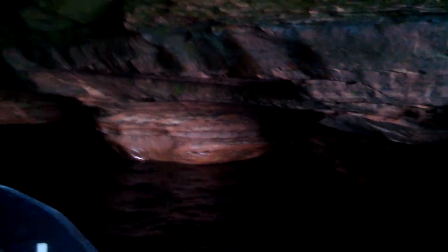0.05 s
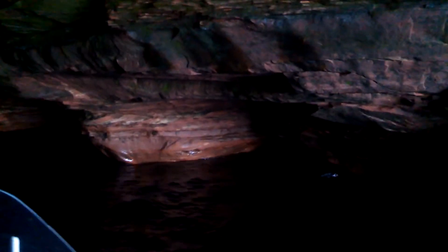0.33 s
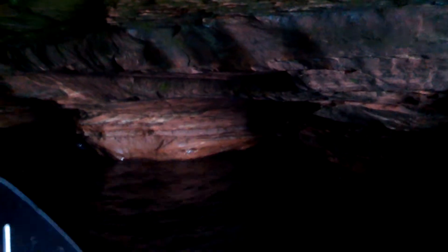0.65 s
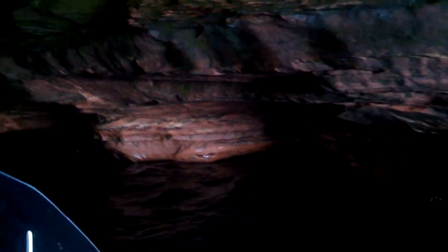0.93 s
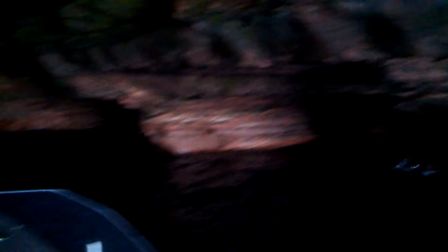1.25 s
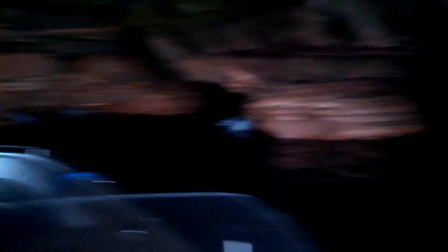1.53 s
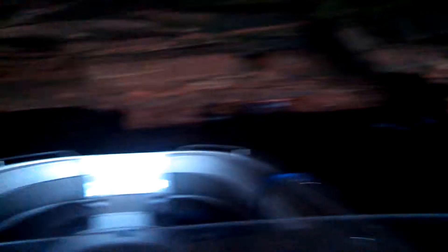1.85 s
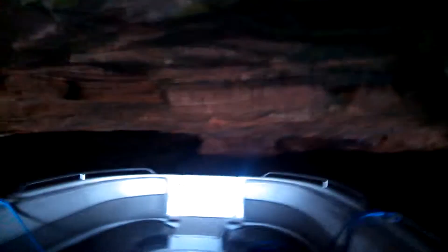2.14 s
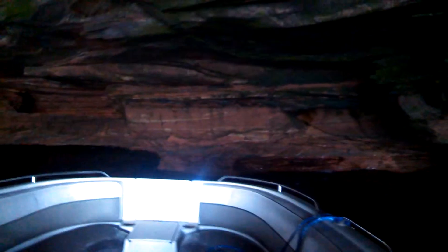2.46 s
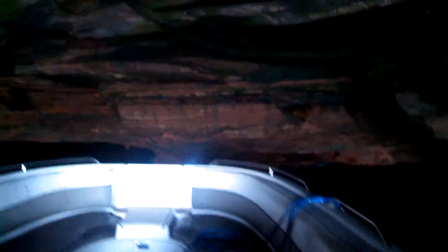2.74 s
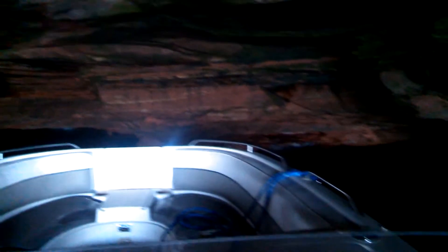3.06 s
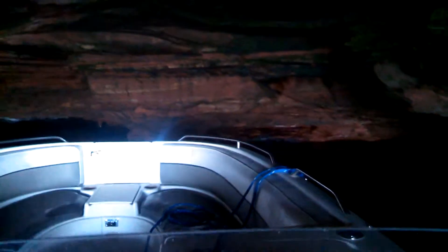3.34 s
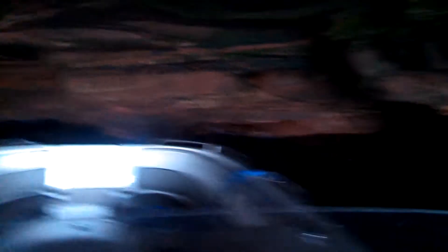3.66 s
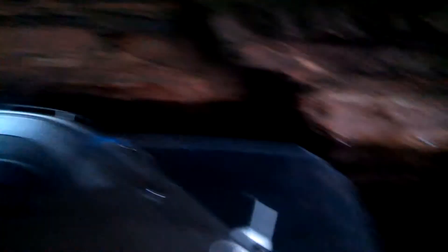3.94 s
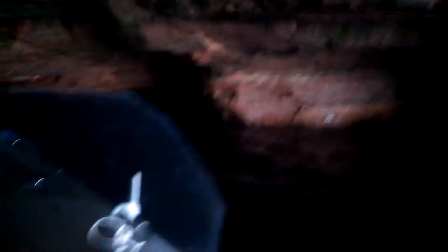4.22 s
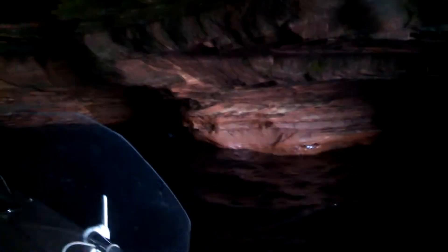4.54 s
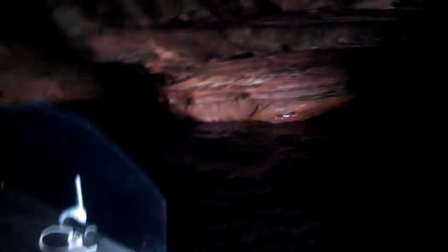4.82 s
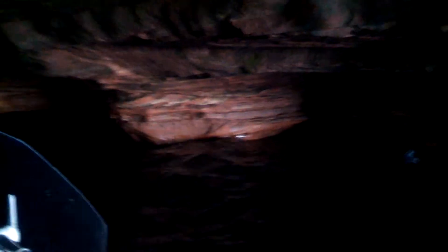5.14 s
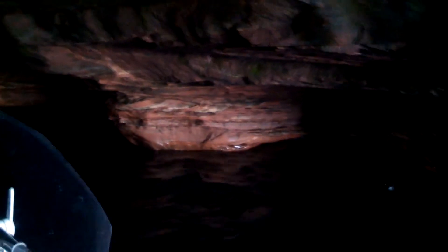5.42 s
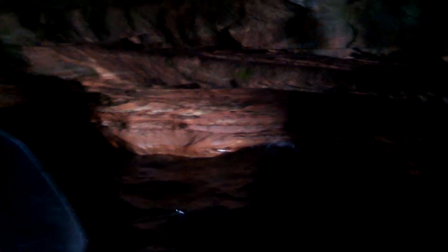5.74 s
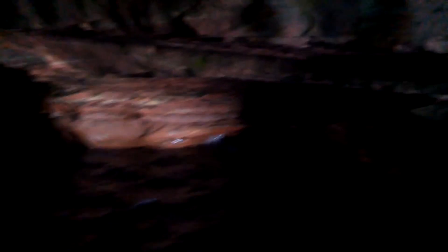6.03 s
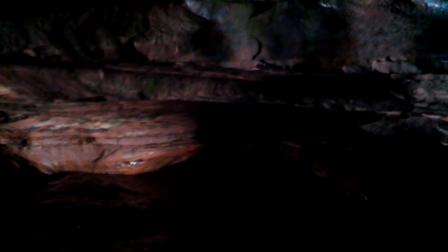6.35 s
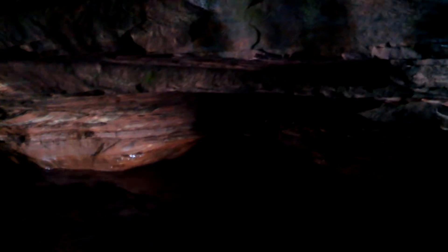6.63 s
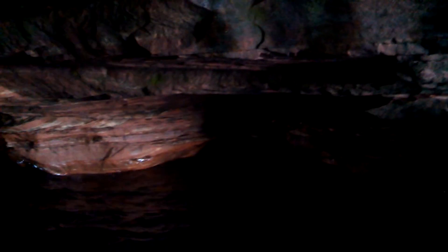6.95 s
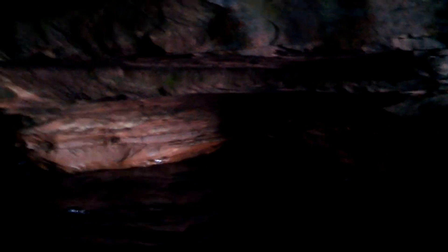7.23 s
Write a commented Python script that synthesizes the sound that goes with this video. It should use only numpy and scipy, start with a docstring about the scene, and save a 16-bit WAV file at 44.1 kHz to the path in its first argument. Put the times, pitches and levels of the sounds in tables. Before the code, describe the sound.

Waves wash against rock inside a cave for about seven and a half seconds, heard close and in wide stereo from a small boat. The churning, bubbling rush never stops, surging gently about three times a second with fine spray and a low, hollow boom underneath. Short gulps of trapped air pop up throughout, clearest near 0.2, 5.8 and 7 seconds. Water gurgles in rock hollows around 0.4 and 0.8 seconds, from 2 to 3 seconds, and near 4.4. Brief splashes stand out, leaning left, around 1, 2.2 and 3.3 seconds, several times between 4.3 and 5.8, and again at the very end. A faint, very deep hum swells to a peak at about 2 seconds and sinks away by 3.5. Soft, dull bumps reach the microphone now and then, most noticeably near 1.8 and 4.3 seconds. The walls add a short echo.

```python
"""Waves wash against the rock deep in a sea cave, heard from a small boat through two close microphones.
Each wave is a rush of churning water with bubbles and spray, and a few splashes stand out.
Trapped air gulps and pouring water gurgles in hollows of the rock; the waves keep the cave's air booming.
A low hum swells once, soft bumps reach the microphones, and the stereo sound is widened."""
import sys
import numpy as np
from scipy import signal
from scipy.fft import rfft, irfft, next_fast_len
from scipy.io import wavfile

SR = 44100
rng = np.random.default_rng(int(sys.argv[2]) if len(sys.argv) > 2 else 0)


def transcribe(u):
    """Save the signal u as a 16-bit wav file named by the first command-line argument.

    u: samples, shape (n,) or (channels, n), limited to [-1, 1]; the rate is SR.
    q: integer samples, one column per channel.
    """
    v = np.clip(np.atleast_2d(u).T, -1, 1)
    q = np.round(v * 32767).astype(np.int16)
    wavfile.write(sys.argv[1], SR, q)


N = 325458
TIME = np.arange(N) / SR
FFT_SIZE = next_fast_len(N + SR, real=True)   # leaves room for the echo
FREQS = np.maximum(np.arange(FFT_SIZE // 2 + 1) * SR / FFT_SIZE, 1)

# Soft bumps on the microphones. "Lean" always means the left level minus the right level.
# (peak time [s], level [dB], pitch [Hz], fade time [s], lean [dB])
MIC_BUMPS = [(0.249, -31, 68.5, 0.047, 4), (1.215, -31, 65, 0.058, 7), (1.598, -34, 53.3, .04, 5),
             (1.772, -26, 65.3, 0.054, 7), (1.92, -28, 55.6, .04, 7), (4.108, -32, 64.4, 0.057, 8),
             (4.268, -24, 63, 0.023, 0), (4.45, -33, 62.3, 0.035, 5), (4.708, -29, 60, .04, 3),
             (5.001, -37, 62, .06, 5), (5.462, -33, 49, 0.033, 24), (5.843, -30, 55.8, 0.064, 7),
             (6.302, -29.5, 53.7, 0.062, 6), (7.101, -34, 58.3, .05, 5)]
# Water pouring through hollows of the rock:
# (peak time [s], level [dB], pitch [Hz], band width [Hz], fade time [s], glide [octaves/s], lean [dB])
HOLLOW_GURGLES = [(0.384, -27, 439, 38, 0.052, .3, 0), (0.753, -27, 350, 57, 0.018, 0.093, 0),
                  (1.679, -32, 386.4, 31, 0.051, -.6, -4), (2.134, -26.5, 435, 20, 0.075, 0.25, 5),
                  (2.411, -30, 435, 18, .07, -0.41, -6), (3.141, -30, 508.5, 22, .16, -.45, -6),
                  (4.352, -28.5, 590, 85, 0.071, -0.0085, -2), (4.48, -31.5, 980, 180, .13, 0.25, 1),
                  (7.328, -36, 1252, 330, 0.088, -0.14, 0)]
# Air pockets gulping in the hollows:
# (peak time [s], relative level [dB], pitch [Hz], fade time [s], glide [octaves/s], lean [dB])
AIR_GULPS = [(0.14, -23.5, 414, 0.041, 0, -5), (0.199, -20, 283, 0.033, .5, -2),
             (0.34, -24, 168, .03, 0.17, 10), (0.42, -28, 344, .03, 0, -2),
             (0.65, -29, 152.6, .035, 0.077, 1), (0.76, -26, 149, .035, 0, 4),
             (0.934, -24, 454, 0.03, -0.05, 0), (1.063, -27, 305, .035, .5, 17),
             (1.52, -24, 177, .032, -.5, -5), (1.633, -28.5, 398, 0.035, -0.5, -6),
             (2.318, -28, 135.5, .04, -0.077, -2.5), (2.616, -31, 98.2, .06, 0.058, 3),
             (2.7, -25, 137, .035, 0.064, 3), (2.9, -28, 143, 0.029, -0.3, -9),
             (3.13, -29, 167, 0.036, 0, -3), (3.298, -24, 93.7, 0.058, 0, 10),
             (4.028, -24, 296, 0.028, 0, -1), (4.057, -25, 419, .03, -0.042, 5),
             (4.335, -25, 470, .03, 0.23, 1), (4.54, -30, 162, .035, -0.11, 2),
             (4.96, -29, 148.5, 0.035, 0.054, 6), (5.078, -28, 290, .03, 0, -3),
             (5.149, -23, 586, 0.035, -0.17, -2), (5.226, -24, 239.5, 0.0307, 0.025, -5),
             (5.318, -29, 339, 0.03, -0.13, -5), (5.512, -23, 290, 0.026, 0, 2),
             (5.815, -20, 178.3, 0.024, -1.05, 8), (5.84, -21.5, 355, 0.028, 0, -2),
             (6.12, -24, 301, 0.025, 0, -2), (6.299, -27, 122.3, 0.061, 0.078, 11),
             (6.344, -25, 273.5, .03, 0, 2), (6.827, -28, 255, 0.046, 0.45, 0),
             (6.85, -25.5, 159.5, .035, 0.0076, 0), (6.898, -21.5, 263, 0.028, .3, -8),
             (6.974, -19.5, 269, .042, .2, 3), (7.355, -21, 366.4, 0.039, -0.25, -6)]
# Splashes near the boat: (start [s], level [dB], centre frequency [Hz], fade time [s])
NEAR_SPLASHES = [(0.81, -29.5, 5000, 0.066), (1.02, -27.5, 7500, 0.047), (2.175, -24.5, 5200, 0.02),
                 (3.285, -28, 5500, 0.024), (4.335, -31, 3000, .025), (4.529, -25.5, 1200, 0.027),
                 (4.69, -21, 1440, 0.016), (5.424, -30, 4000, .035), (5.555, -24.5, 7440, 0.017),
                 (5.815, -27, 2280, 0.035), (7.355, -26, 1700, .05)]
# How strong the washing water is from bass to treble: (frequency [Hz], relative level [dB])
WASH_COLOUR = [(25, -79), (45, -60), (65, -51), (95, -54), (200, -51), (280, -51), (600, -53), (820, -55.5),
               (1200, -59), (2500, -64), (3600, -68), (5700, -72.5), (7000, -72.5), (8900, -70.5),
               (10800, -80.5), (13000, -79.5), (15000, -76.5)]
# How far the wash leans to the left microphone: (frequency [Hz], lean [dB])
WASH_LEAN = [(60, 12.5), (150, 0), (600, 0.5), (2000, 1), (3400, 16.5), (5000, 0.5), (8000, 9), (10400, 14),
             (11700, 9), (13000, 1.8)]
# How alike the wash is at the two microphones: (frequency [Hz], likeness [-1 opposite to 1 same])
WASH_LIKENESS = [(50, -0.96), (110, 0.47), (220, 0.29), (450, 0.64), (900, 0.56), (1400, -0.11),
                 (2400, -0.029), (12000, -0.066)]
# Waves running up the rock. The last three columns add to the wave's level.
# (start [s], rise time [s], length [s], relative level [dB], rush [dB], spray [dB], boom [dB])
WAVES = [(-0.19, .028, 0.17, 2.5, -0.5, -1, -1.5), (0.08, 0.038, 0.077, 2.8, -1.5, -4, -17),
         (0.293, 0.017, 0.25, -0.2, -2, -1.5, -7), (0.595, 0.038, 0.27, -2.5, 2.5, 0.5, 6.5),
         (0.86, 0.042, 0.26, -2.5, 1.5, 1, -2), (1.13, .025, 0.21, -3, -0.5, -7, 3),
         (1.387, 0.026, 0.35, -1.4, -0.5, 0.2, -10), (1.88, 0.053, 0.31, -9, 5.5, 6, -11),
         (2.25, 0.023, 0.22, 0.5, -2.5, -4.5, 3), (2.634, .028, 0.49, -0.9, 0, 0.5, -1.5),
         (2.99, .028, 0.28, -3, -2, -2, 6), (3.587, 0.028, 0.36, -10.5, 5, 5.5, 11),
         (3.878, 0.029, 0.37, -0.5, -1.4, -2, -11), (4.233, 0.037, 0.12, 0.9, 2, 1, -0.5),
         (4.45, 0.037, 0.11, -2.5, 3.5, 1.3, 4), (4.673, 0.015, 0.12, -1.8, -1, -17, -3),
         (4.978, 0.023, 0.39, 1.2, -2, -4, -2.5), (5.348, .035, 0.19, -2, 1.3, -0.3, 1),
         (5.752, 0.02, 0.068, 2, -0.5, -10, 4), (5.966, 0.016, 0.19, -3, 2.5, 0, 2),
         (6.24, .028, 0.072, 2.5, -2.8, -7, -3), (6.497, 0.023, 0.27, -1, -2, -5, 0),
         (6.716, 0.023, 0.4, -6, 3.5, 2, 6), (7.03, 0.061, 0.24, -7.5, 8, 8, 7),
         (7.24, .05, 0.33, -1.5, 4, 1.5, 0)]


def from_db(db):
    """Turn decibels into a number to multiply a sound by."""
    return 10 ** (np.asarray(db) / 20)


def unit_power(x):
    """Scale a sound so that its average power is 1."""
    return x / np.sqrt(np.mean(x ** 2) + 1e-20)


def curve(points):
    """Join a table's points into a curve with a value for each frequency in FREQS."""
    hz, values = np.array(points).T
    return np.interp(np.log(FREQS), np.log(hz), values)


def to_time(spectrum):
    """Turn a spectrum back into samples."""
    return irfft(spectrum, FFT_SIZE)[..., :N]


def pan(lean_db):
    """Left and right gains that move a sound sideways and keep its power."""
    gains = from_db(np.array([[.5], [-.5]]) * lean_db)
    return gains / np.sqrt(np.mean(gains ** 2, axis=0))


def drift(rate_hz):
    """A smooth random wobble, about 1 in size; a higher rate makes it quicker."""
    step, warm_up = 40, 2000   # one value every 40 samples; the first 2000 values are dropped
    memory = np.exp(-2 * np.pi * step * rate_hz / SR)
    noise = rng.standard_normal(N // step + warm_up + 2)
    slow = signal.lfilter([1], [1, -2 * memory, memory ** 2], noise)[warm_up:]
    return np.interp(np.arange(N) / step, np.arange(len(slow)), unit_power(slow))


def cave_echo(sound, echo_db, ring_s=1):
    """The rock walls add a smooth echo, different on each side, that falls 60 dB in ring_s."""
    t = TIME[:SR]
    build_up = 1 - np.exp(-t / 0.038)
    tail = rng.standard_normal((2, len(t))) * from_db(-60 * t / ring_s) * build_up
    tail /= np.sqrt(np.sum(tail ** 2, axis=1, keepdims=True))
    return sound + from_db(echo_db) * to_time(rfft(sound, FFT_SIZE) * rfft(tail, FFT_SIZE))


def swell_db(calm_db, rush_share=0, spray_share=0, boom_share=0, drain_s=0.28):
    """The level of the calm water plus all waves; each builds up, holds and drains away."""
    power = from_db(calm_db) ** 2
    for start_s, rise_s, length_s, level_db, rush_db, spray_db, boom_db in WAVES:
        age = np.maximum(TIME - start_s, 0)
        shape = (1 - np.exp(-age / rise_s)) * np.exp(-np.maximum(age - length_s, 0) / drain_s)
        extra_db = rush_share * rush_db + spray_share * spray_db + boom_share * boom_db
        power = power + (shape * from_db(level_db + extra_db)) ** 2
    return 10 * np.log10(power)


def stereo_tone(phase, lean_db, right_lag_rad):
    """A pure tone of power 1 whose right side lags by part of a cycle."""
    return np.sqrt(2) * np.sin(phase - [[0], [right_lag_rad]]) * pan(lean_db)


def throb(peak_s, level_db, hz, fade_s, glide, lean_db, waver, right_lag_rad=0):
    """A short ringing tone swells and fades; its pitch wobbles by about the fraction waver."""
    near = abs(TIME - peak_s) < 6 * fade_s
    t = TIME[near] - peak_s
    pitch_hz = hz * 2 ** (glide * t) * (1 + waver * drift(11.9)[near])
    phase = 2 * np.pi * np.cumsum(pitch_hz) / SR
    shape = from_db(level_db) / np.cosh(t / fade_s * np.pi / 2)   # a bell-shaped curve
    out = np.zeros((2, N))
    out[:, near] = shape * stereo_tone(phase, lean_db, right_lag_rad)
    return out


def hum(peak_s=2.08, rise_s=0.4, fall_s=0.8, faint_hz=34, bend_hz=5.2):
    """A deep tone swells once and sinks back; its pitch bends up as it gets louder."""
    t = TIME - peak_s
    strength = np.exp(-(t / np.where(t < 0, rise_s, fall_s)) ** 2)
    phase = 2 * np.pi * np.cumsum(faint_hz + bend_hz * strength) / SR
    return from_db(-35) * strength * stereo_tone(phase, lean_db=6, right_lag_rad=-2.9)


def bumps():
    """Dull knocks move the two microphones in nearly opposite directions."""
    return sum(throb(peak_s, level_db, hz, fade_s, glide=0, lean_db=lean_db, waver=0.062,
                     right_lag_rad=-2.5) for peak_s, level_db, hz, fade_s, lean_db in MIC_BUMPS)


def cave_boom(low_hz=118.8, high_hz=164.2):
    """The waves keep the air in the cave ringing on a cluster of low notes."""
    band = signal.butter(2, [low_hz, high_hz], "band", fs=SR, output="sos")
    shared, apart = signal.sosfilt(band, rng.standard_normal((2, N + SR)))[:, SR:]
    ringing = unit_power(shared + from_db(-2.5) * apart * [[1], [-1]])
    return from_db(-34.5 + swell_db(calm_db=-6, boom_share=1)) * ringing


def gurgles():
    """Swirling water keeps a hollow ringing; the rough note glides as the hollow fills or drains."""
    out = 0
    for peak_s, level_db, hz, width_hz, fade_s, glide, lean_db in HOLLOW_GURGLES:
        t = np.clip(TIME - peak_s, -8 * fade_s, 8 * fade_s)
        phase = 2 * np.pi * np.cumsum(hz * 2 ** (glide * t)) / SR
        ringing = drift(width_hz) * np.sin(phase) + drift(width_hz) * np.cos(phase)
        shape = from_db(level_db) / np.cosh(t / fade_s * np.pi / 2)
        out = out + shape * ringing * pan(lean_db)
    return cave_echo(out, echo_db=-21)


def gulps():
    """Trapped air rings; its pitch glides as the hollow fills or drains."""
    return sum(throb(*gulp, waver=0.0224) for gulp in AIR_GULPS)


def splashes(rise_s=0.0052):
    """A small wave slaps the rock and throws a short burst of grainy spray."""
    out = np.zeros((2, N))
    t = TIME[:SR // 2]
    for start_s, level_db, hz, fade_s in NEAR_SPLASHES:
        start = int(start_s * SR)
        grains = rng.standard_normal((2, len(t))) * from_db(1.8 * rng.standard_normal(len(t)))
        band = signal.butter(1, [hz / 2, min(hz * 2, .45 * SR)], "band", fs=SR, output="sos")
        shape = (1 - np.exp(-t / rise_s)) * np.exp(-t / fade_s)
        burst = unit_power(signal.sosfilt(band, grains)) * shape
        out[:, start:start + len(t)] += from_db(level_db) * burst[:, :N - start]
    return out * pan(lean_db=10)


def bubbles(count, low_hz, high_hz, cycles, rise, spread_db):
    """Bubbles ring briefly, rising in pitch near the surface or sinking as an air pocket opens."""
    out = np.zeros((2, N))
    for when, smallness, strength, angle in rng.random((count, 4)):
        hz = low_hz * (high_hz / low_hz) ** smallness
        start, life_s = int(when * N), cycles / hz
        t = TIME[:min(int(life_s * SR), N - start)]
        ring = np.sin(2 * np.pi * hz * t * (1 + rise * t / life_s)) * from_db(-60 * t / life_s)
        gain = hz * from_db(spread_db * min(-np.log(1 - strength), 4))
        direction = [[np.cos(2 * np.pi * angle)], [np.sin(2 * np.pi * angle)]]
        out[:, start:start + len(t)] += gain * ring * direction
    # as strong as plain white noise is between low_hz and high_hz
    return unit_power(out) * np.sqrt((high_hz - low_hz) / (SR / 2))


def droplets(per_s, spread_db, low_hz):
    """Spray falls back as clumps of tiny ticks of uneven size."""
    lands = rng.random((2, N)) < per_s * from_db(3 * drift(8)) / SR
    sizes = from_db(spread_db * np.minimum(rng.exponential(1, (2, N)), 5))
    ticks = lands * sizes * rng.choice([-1, 1], (2, N))
    bass_cut = signal.butter(2, low_hz, "high", fs=SR, output="sos")
    return unit_power(signal.sosfilt(bass_cut, ticks + 1e-18))


def churning_water():
    """A steady mix of swirling water, small bubbles, slower glugs under the ledges and falling spray."""
    small = bubbles(count=2200, low_hz=300.4, high_hz=2456, cycles=32.6, rise=0.07, spread_db=2.5)
    glugs = bubbles(count=560, low_hz=198.8, high_hz=810, cycles=50, rise=-0.059, spread_db=0)
    bubbling = cave_echo(from_db(-10) * small + from_db(-8.5) * glugs, echo_db=-3.5)
    fizz = cave_echo(droplets(per_s=2500, spread_db=1.5, low_hz=1680), echo_db=-2)
    swirl = rng.standard_normal((2, N))
    return from_db(-1.79) * swirl + bubbling + from_db(-8) * fizz


def spectrum_at_microphones(water):
    """Give the water the tone colour, width and direction it has at the two microphones."""
    shared, apart = rfft(water, FFT_SIZE)
    alike = curve(WASH_LIKENESS)
    pair = np.sqrt((1 + alike) / 2) * shared + np.sqrt((1 - alike) / 2) * apart * [[1], [-1]]
    return pair * pan(curve(WASH_LEAN)) * from_db(curve(WASH_COLOUR)) * np.sqrt(SR / 2)


def wash(churn_flicker_db=0.16, spray_flicker_db=1.0):
    """The water gets louder as each wave runs up the rock; each half octave also flickers a little."""
    churn_db = swell_db(calm_db=-2.8)
    rush_db = swell_db(calm_db=-6, rush_share=1)
    spray_db = swell_db(calm_db=-3.5, spray_share=0.91)
    spectrum = spectrum_at_microphones(churning_water())
    centres_hz = 60 * 2 ** (np.arange(17) / 2)
    band_number = np.interp(np.log(FREQS), np.log(centres_hz), np.arange(len(centres_hz)))
    out = 0
    for k, hz in enumerate(centres_hz):
        band = to_time(spectrum * np.maximum(1 - abs(band_number - k), 0))
        # the deepest rumble ignores the waves; going up, churn, rush and spray take over in turn
        low, middle, top = [np.clip(np.log2(hz / edge_hz), 0, 1) for edge_hz in (120, 520, 1800)]
        level_db = low * churn_db + middle * (rush_db - churn_db) + top * (spray_db - rush_db)
        flicker_db = churn_flicker_db + top * (spray_flicker_db - churn_flicker_db)
        out = out + band * from_db(level_db + flicker_db * drift(15.6))
    return out


def scene():
    """The wash, gurgles and boom, with splashes and gulps echoing off the walls, plus bumps and hum."""
    water = from_db(-0.79) * wash() + gurgles() + cave_boom()
    nearby = splashes() + from_db(-4.5) * gulps()
    low_sounds = bumps() + hum()
    return water + cave_echo(nearby, echo_db=-8) + low_sounds


def record(dry, widen_above_hz=970, delay_s=16 / SR, rumble_hz=27, top_hz=15450):
    """Widen the stereo sound, lift the right side a little, and cut the deepest bass and highest treble."""
    spectrum = rfft(dry, FFT_SIZE)
    # widening: each side has a slightly late copy of the other side's treble taken away from it
    share = 1 / (1 + (widen_above_hz / FREQS) ** 4)
    other_side = share * np.exp(-2j * np.pi * FREQS * delay_s) * spectrum[::-1]
    wide = to_time((spectrum - other_side) / np.sqrt(1 + share ** 2)) * pan(lean_db=-0.7)
    wide = signal.sosfilt(signal.butter(4, rumble_hz, "high", fs=SR, output="sos"), wide)
    top_cut = 1 / np.sqrt(1 + (FREQS / top_hz) ** 600)
    return to_time(rfft(wide, FFT_SIZE) * top_cut)


dry = scene()
out = record(dry)
transcribe(out)
```